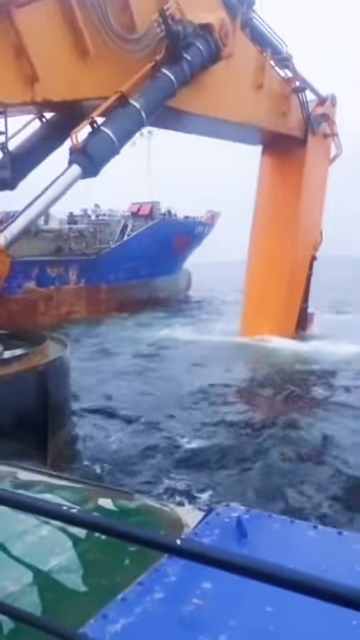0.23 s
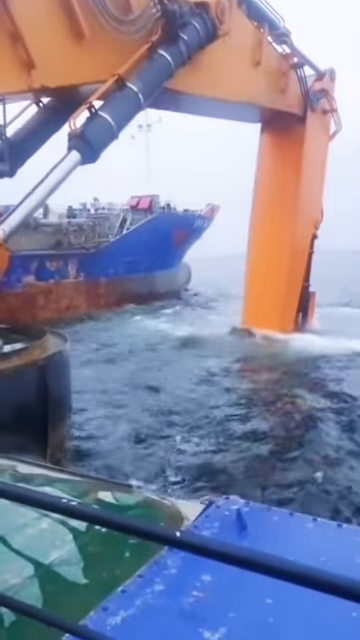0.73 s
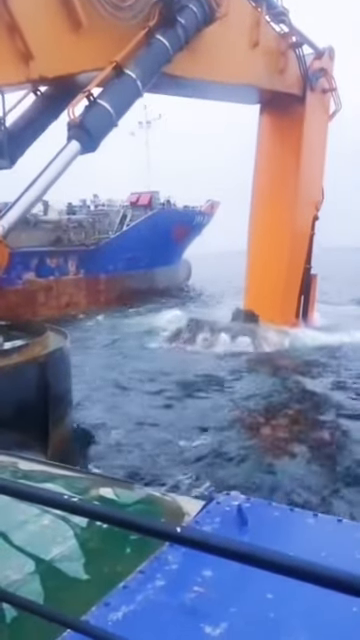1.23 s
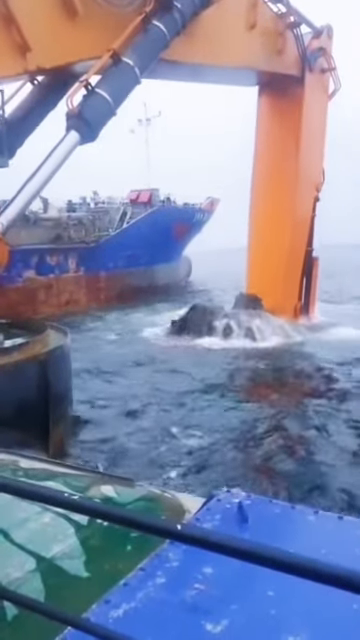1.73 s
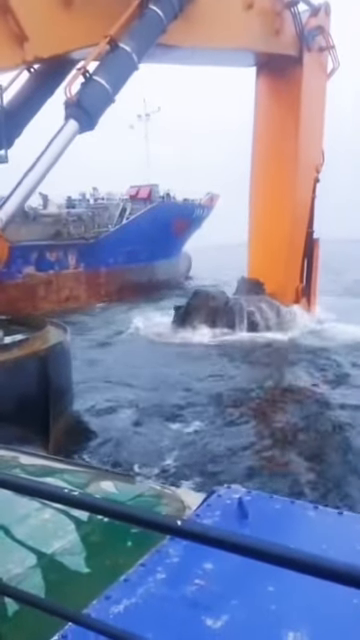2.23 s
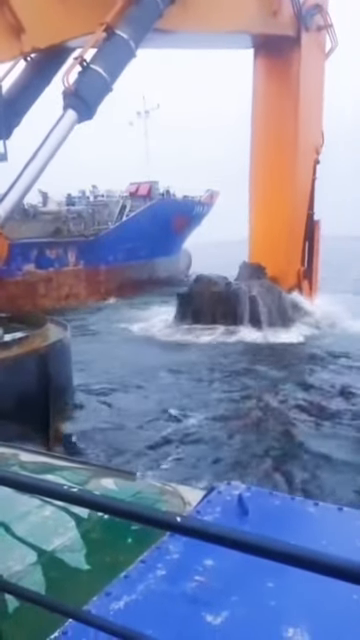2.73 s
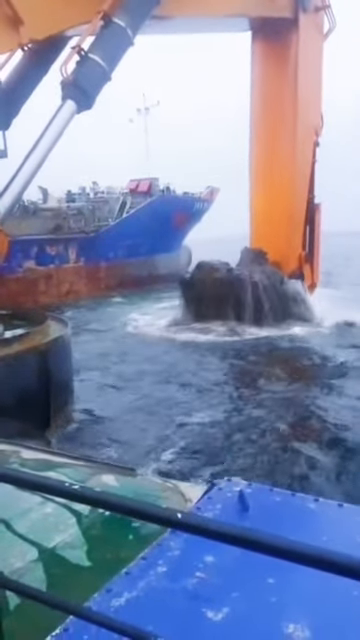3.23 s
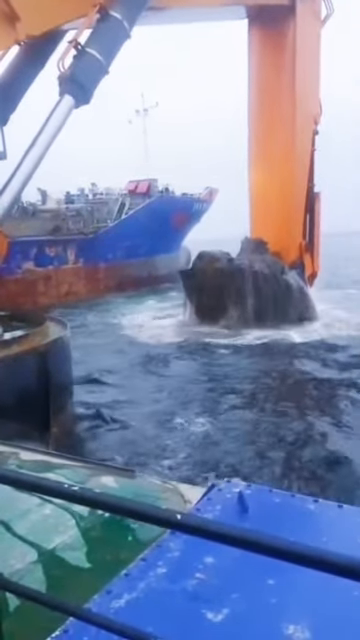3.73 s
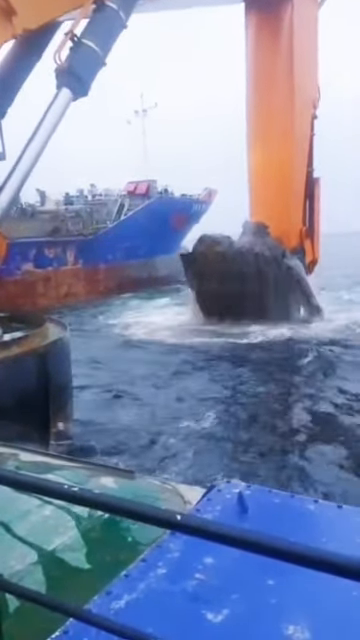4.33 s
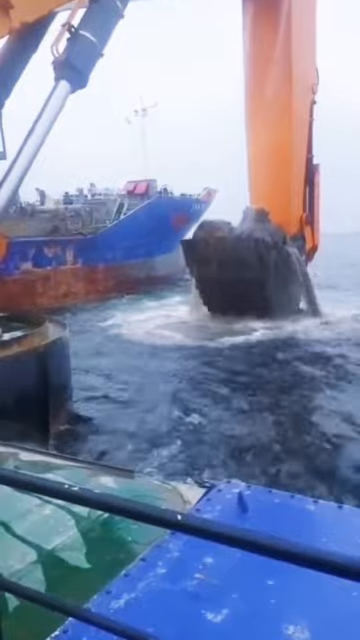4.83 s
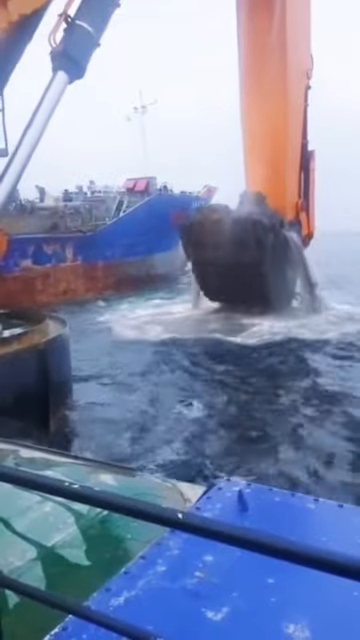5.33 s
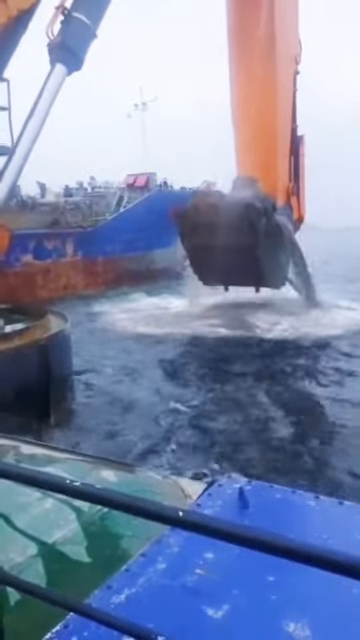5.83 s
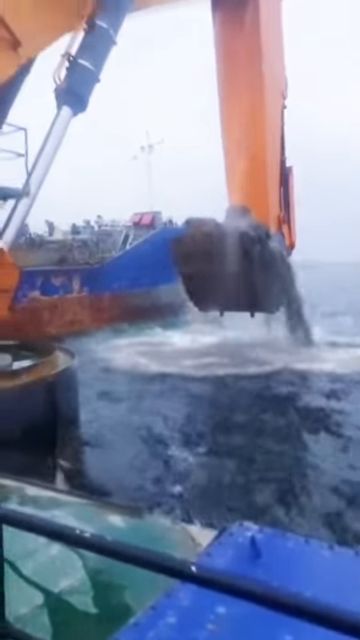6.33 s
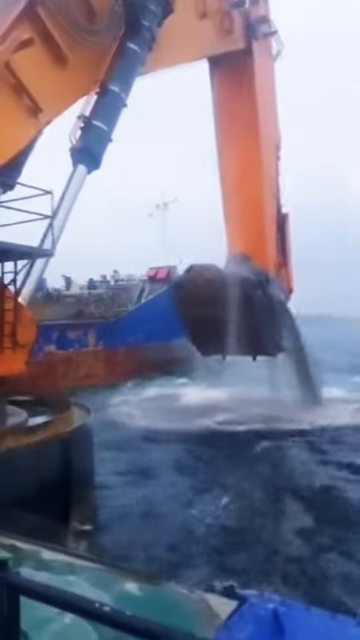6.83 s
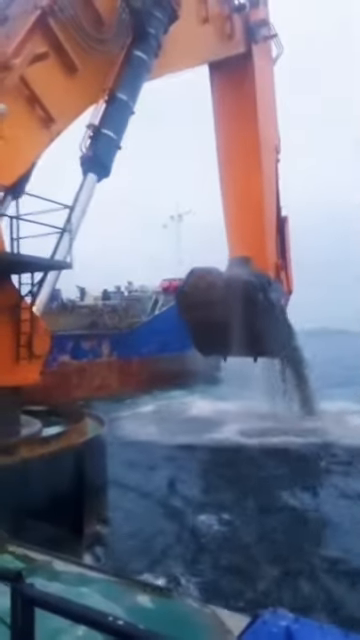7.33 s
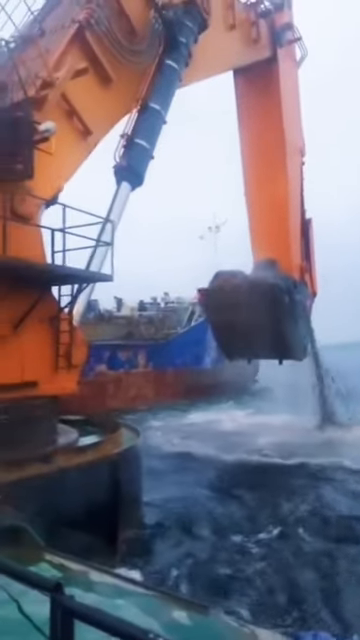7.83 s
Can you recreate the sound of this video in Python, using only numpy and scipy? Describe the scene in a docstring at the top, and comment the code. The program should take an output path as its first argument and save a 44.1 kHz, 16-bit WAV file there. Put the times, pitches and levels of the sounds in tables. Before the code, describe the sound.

On an open deck at sea, a large diesel drones low and steady beneath a wavering hydraulic pump and gear whine. Hard wind thumps the right side of a phone microphone for three seconds, then drops. Broad engine and fan roar continues; around five seconds water streaming from the rising bucket adds a brighter hiss. Thin whistles flutter, and the right side's bass keeps cutting out.

```python
"""A diesel drones on the deck of a dredger: sines at multiples of its cycle. Sines also make the song
of a nine-piston hydraulic pump and its gears, and thin whistles. Wind, lumpy noise, buffets the right port
of a phone, hard for three seconds; after that the right side's bass keeps dropping out. Behind it all,
banded noise is the roar of engine, fans and water streaming off the bucket."""
import sys
import numpy as np
from scipy import signal
from scipy.fft import rfft, irfft, next_fast_len
from scipy.io import wavfile
from scipy.ndimage import uniform_filter1d

SR = 44100
rng = np.random.default_rng(int(sys.argv[2]) if len(sys.argv) > 2 else 0)


def to_wav(sig):
    """Store sig (one row per channel, or 1-D mono) as 16-bit WAV at the path in sys.argv[1].

    Samples outside -1..1 are clipped; the rate is SR.
    """
    pcm = np.clip(np.atleast_2d(sig), -1, 1) * 32767
    pcm = np.round(pcm).astype(np.int16)
    wavfile.write(sys.argv[1], SR, pcm.T)  # frames by channels


N = 356548

# brighter hiss around 5.4 kHz while water pours, and two rough whistles before their flutter:
# time_s, added_db, rough_1_db, rough_2_db
BRIGHTNESS = [(0, 0, -62, -62), (2.9, 0, -60, -66), (3.1, -2, -66, -66), (4, 0, -56, -66),
              (4.4, 0, -60, -62), (5, 2.5, -50, -62), (5.35, 3, -54, -51), (5.9, 2.5, -55, -55),
              (6.2, 0, -58, -59), (6.6, -1, -64, -60), (8.08, -1, -62, -64)]


def undb(db):
    """Amplitude factor of a level in dB."""
    return 10 ** (np.asarray(db) / 20)


def curves(table):
    """Each column of a table, joined by straight lines over time."""
    time_s, *columns = np.transpose(table)
    return [np.interp(np.arange(N) / SR, time_s, column) for column in columns]


def bumps(events, edge_s):
    """Sum of flat-topped bumps (start s, length s, height) with sloped edges."""
    s = np.arange(N) / SR
    total = 0
    for start, length, height in events:
        inside_s = np.minimum(s - start, start + length - s)
        total = total + height * np.clip(inside_s / edge_s + .5, 0, 1)
    return total


def walk(rate_hz):
    """Random levels, each held for 1 / rate_hz and slewed twice; spread near 1."""
    hold = int(SR / rate_hz)
    steps = np.repeat(rng.standard_normal(N // hold + 1), hold)
    return 2.45 * uniform_filter1d(uniform_filter1d(steps, hold), hold)[:N]


def bands(spectrum, noise, count):
    """Noise of a given colour in overlapping bands, count an octave: yields (centre Hz, sound)."""
    size = next_fast_len(N)
    octave = np.log2(np.arange(1, size // 2 + 2) * SR / size)
    hz, db = np.transpose(spectrum)
    colour = undb(np.interp(octave, np.log2(hz), db)) * np.sqrt(SR / 2)
    coloured = rfft(noise, size) * colour
    for centre in np.arange(4, 14.5, 1 / count):
        share = np.clip(1 - count * abs(octave - centre), 0, 1)
        yield 2 ** centre, irfft(coloured * share, size)[..., :N]


def tone(turns, waver_db, rate_hz, lag_rad, stray_rad):
    """A sine at both ports: paths over steel and water interfere, so level and phase waver; the left lags."""
    stray = stray_rad * np.array([walk(rate_hz / 2), walk(rate_hz / 2)])
    phase = 2 * np.pi * (turns + rng.random()) + stray
    # each port fades by itself, and partly with the other
    fade_db = -waver_db * abs(np.array([walk(rate_hz), walk(rate_hz)]) + 0.66 * walk(rate_hz))
    return np.sqrt(2) * undb(fade_db) * np.sin(phase - lag_rad * np.array([[1], [0]]))


def diesel(rumble_db):
    """Low orders of the firing cycle, uneven cylinders."""
    # multiples of the diesel's cycle, before their waver: multiple, level_db (against the rumble)
    orders = [(3, -17.5), (4, -10.5), (5, -3), (7, -15.5), (8, -9.5), (9, -12.5), (13, -22)]
    cycle_hz = 15.0
    turns = cycle_hz * np.arange(N) / SR
    drone = sum(undb(db) * tone(k * turns, 0.6, 9., 0.14, 0.077) for k, db in orders)
    return undb(rumble_db) * drone


def pump(rush_db):
    """Nine pressure beats a turn, and the gears on the same shaft."""
    # shaft speed, hunting under load: time_s, speed_hz
    shaft = [(0.0, 23.94), (0.36, 23.92), (0.81, 24.39), (1.55, 24.01), (1.96, 24.15), (2.71, 24.12),
             (2.99, 24.47), (3.13, 24.29), (3.64, 24.1), (4.19, 24.22), (5.78, 24.02), (7.06, 24.28),
             (7.79, 23.92), (8.08, 23.99)]
    # first three piston tones swell and fade; before waver, a 4 dB lift and a right side 1.5 dB down:
    # time_s, tone_1_db, tone_2_db, tone_3_db
    piston = [(0.0, -19, -18.5, -37), (0.04, -20.5, -30.5, -42), (0.58, -23, -28.5, -43),
              (0.65, -42, -41, -44), (0.92, -29, -40.5, -39), (1.42, -36, -27.5, -44),
              (1.53, -20.5, -31, -47), (1.6, -18, -37, -39), (1.64, -21, -27.5, -47),
              (1.85, -27, -29.5, -42), (2.54, -38, -31.5, -46), (2.65, -32, -38, -43), (2.7, -24, -27, -39),
              (2.74, -39, -44, -35), (2.83, -28, -36, -42), (2.97, -32, -43, -47), (3.04, -39, -38, -39),
              (3.11, -29, -45, -43), (3.49, -27, -35, -52), (3.62, -37.5, -32.5, -48),
              (4.28, -23, -34, -52), (4.34, -21, -25.5, -46), (4.86, -27.5, -23, -36.5),
              (4.93, -22, -22, -45), (5.62, -48, -26, -42), (5.74, -23, -24, -34.5),
              (6.03, -21.5, -24.5, -32.5), (6.37, -20, -40.5, -43), (6.55, -18, -24, -38),
              (6.73, -34, -26, -51), (6.91, -20.5, -29, -54), (6.95, -22, -21, -33), (7.0, -32, -28, -41),
              (7.09, -15.5, -26, -37), (7.18, -24, -38, -34), (7.25, -16.5, -29, -35),
              (7.29, -35, -38, -49), (7.36, -33, -20.5, -34), (7.43, -23, -25, -43), (7.47, -35, -24, -49),
              (7.58, -13.5, -22.5, -33), (7.67, -36, -35, -30), (7.76, -30, -23, -31),
              (7.9, -20, -52, -32.5), (7.99, -16.5, -51, -29), (8.08, -29, -30, -29.5)]
    # other multiples of the shaft, before waver: multiple, level_db (against the rush)
    orders = [(8, -6), (10, 7.5), (16, -2), (17, 2), (36, -1), (45, -3.5), (54, -6.5), (63, -10),
              (72, -5.5), (81, -11)]
    # mesh of a 46-tooth gear, before waver: multiple (of the shaft), level_db (against the rush)
    gear_mesh = [(46, 2), (138, -10.5)]
    # second mesh harmonic before skips and waver; its paths shift, so each port hears it differently:
    # time_s, left_db, right_db, left_lag_rad
    whine_path = [(0.0, -34, -31, -2.8), (0.2, -30, -30, -3.1), (0.37, -30, -30, -3.1),
                  (0.43, -42, -26, -2.1), (0.53, -40, -35, -4.2), (0.63, -29, -40, -9.3),
                  (0.68, -33, -35, -7.5), (0.79, -39, -31, -5.9), (0.97, -37, -36, -6.4),
                  (1.07, -30, -42, -4.5), (1.2, -40, -39, -0.1), (1.44, -33, -29, -3.6),
                  (1.58, -33, -27, -4.3), (1.65, -31, -29, -4.5), (1.73, -38, -40, -3.5),
                  (1.87, -42, -39, -0.4), (2.36, -42, -31, -1.4), (2.7, -40, -36, -0.8),
                  (2.83, -34, -42, -2.5), (2.91, -41, -33, 2.2), (3.0, -42, -29, 5.5),
                  (3.07, -37, -38, 3.1), (3.14, -34, -38, -2.8), (3.25, -29, -33, 1.1),
                  (3.51, -39, -32, 4.7), (3.64, -36, -36, 3.5), (3.76, -42, -42, 7.0),
                  (3.84, -37, -33, 5.0), (4.19, -37, -40, 5.9), (4.45, -32, -31, 4.6),
                  (4.51, -41, -30, 4.9), (4.75, -31, -32, 6.1), (4.9, -32, -29, 5.2), (5.04, -39, -32, 5.8),
                  (5.43, -34, -30, 3.9), (5.5, -30, -30, 3.2), (5.56, -33, -32, 2.9), (5.63, -29, -26, 2.4),
                  (5.78, -29, -24, 2.5), (5.85, -29, -24, 2.7), (6.04, -33, -28, 2.2), (6.1, -38, -39, 3.1),
                  (6.18, -42, -37, 6.1), (6.29, -31, -34, 5.2), (6.48, -34, -35, 5.9),
                  (6.57, -28, -28, 6.4), (6.72, -32, -36, 6.0), (6.8, -34, -38, 3.4), (7.09, -33, -30, 1.8),
                  (7.3, -41, -42, 4.1), (7.63, -26, -29, 5.7), (7.69, -27, -24, 6.6), (7.87, -27, -31, 8.0),
                  (7.94, -28, -29, 7.2), (8.08, -36, -34, 4.0)]
    # the whine skips or chirps briefly at both ports: start_s, length_s, added_db
    skips = [(0.52, 0.035, -3), (3.04, .05, -11), (3.435, 0.018, 11.5), (3.485, 0.029, 7),
             (3.655, .04, -13), (5.155, .025, -6), (6.08, 0.052, -6), (6.74, .04, -6), (7.07, 0.046, 2),
             (7.195, .03, -7), (7.26, 0.079, -8)]
    skip_edge_s, overtone_db = 0.0059, -20  # overtone before waver, against the whine

    turns = np.cumsum(curves(shaft)[0]) / SR
    port_db = np.array([[0], [-1.5]]) + 4.0
    beats = 0
    for k, db in enumerate(curves(piston), 1):
        beats = beats + undb(db + port_db) * tone(9 * k * turns, 2.05, 20., 0.45, 0.27)
    upper = sum(undb(db) * tone(k * turns, 2.1, 20., 0.11, 0.76) for k, db in orders)
    mesh = sum(undb(db) * tone(k * turns, 4.3, 30., 2.35, k / 70) for k, db in gear_mesh)

    *port_dbs, whine_lag = curves(whine_path)
    whine_dbs = np.array(port_dbs) + bumps(skips, skip_edge_s)
    whine = undb(whine_dbs) * tone(92 * turns, 1.1, 25., whine_lag, 0.05)
    octave_db = np.mean(whine_dbs, axis=0) + overtone_db
    octave_tone = undb(octave_db) * tone(184 * turns, 5., 30., 2.35, 2.2)
    return beats + undb(rush_db) * (upper + mesh) + whine + octave_tone


def wind():
    """Eddies burst against the right port in quick lumps; strong puffs reach higher."""
    # wind blows hard, then drops; before puffs and lumps: time_s, level_db
    blow = [(0, -11.5), (.55, -14.5), (.9, -10), (1.15, -11), (1.4, -14), (1.75, -15.5), (2.2, -9.5),
            (2.6, -11.5), (2.93, -13), (3.06, -11), (3.09, -20), (4.1, -27.5), (4.7, -21.5), (8.08, -17.5)]
    # colour at the port before the upper eddies are weighted: pitch_hz, density_db (per Hz)
    gust = [(25, -56), (40, -29), (70, -23.5), (160, -27.5), (260, -23.5), (500, -27), (1000, -32),
            (2000, -43), (4000, -55), (8000, -79.5)]
    # sharp puffs: start_s, added_db (upper eddies, before their reach), length_s
    puffs = [(0.27, 2, 0.037), (0.402, 2.5, 0.018), (0.497, -1, 0.02), (0.606, 5.5, 0.043),
             (0.67, 6, 0.039), (0.801, 3.5, 0.018), (0.92, 4, 0.11), (1.126, 0, 0.074), (1.79, 3, 0.033),
             (1.982, 4, 0.032), (2.116, 2, 0.061), (2.16, 6, .055), (2.237, 5.5, 0.055),
             (2.398, 3.5, 0.032), (2.735, 7.5, 0.037), (2.806, 6, 0.038), (2.875, 4.5, 0.022),
             (2.974, 5, 0.045), (3.02, 5.5, 0.029), (3.051, 5, 0.02), (5.726, 11, .03), (5.839, 13, 0.032),
             (6.028, 10.5, 0.041), (6.253, 7, 0.035), (6.57, 8.5, 0.057), (7.074, 6, 0.035),
             (7.332, 2, 0.029)]
    puff_rise_s = 0.003
    upper_eddies_db = -14.5  # against the level, before their reach
    puff_bass = 0.23  # share of a puff's dB that lifts the whole wind, bass included

    puff_db = bumps([(start, length, db) for start, db, length in puffs], puff_rise_s)
    upper_db = upper_eddies_db + puff_db + 0.5 * walk(16.0) + 2.0 * np.tanh(walk(60.))
    lumps = undb(2.87 * np.tanh(walk(90.) / 0.64) + 0.15 * walk(30.))
    gusts = 0
    for hz, band in bands(gust, rng.standard_normal(N) * lumps, count=2):
        reach = np.clip(np.log2(hz / 250) / 2.1, 0, 1.1)
        gusts = gusts + undb(reach * upper_db) * band
    return undb(curves(blow)[0] + puff_bass * puff_db) * gusts


def whistles():
    """Thin tones of other machines, broken by quick flutter."""
    # whistle of fixed pitch, before flutter: pitch_hz, level_db (against its level curve)
    thin = [(2402, 9)]
    # that whistle comes and goes: time_s, level_db
    thin_level = [(0.0, -67), (0.72, -45.5), (1.06, -66), (1.15, -53), (1.78, -48), (1.86, -53), (2.0, -42),
                  (2.11, -47), (3.4, -56), (3.49, -49), (3.56, -57), (3.96, -45), (4.03, -65), (4.16, -48),
                  (4.5, -43), (4.63, -54), (4.86, -39), (5.31, -48), (6.17, -54), (6.53, -42),
                  (6.57, -37.5), (6.8, -57), (7.9, -49), (8.08, -59)]
    # the two rough whistles: pitch_hz
    rough_pitches = [5055, 5665]
    s = np.arange(N) / SR
    rough = 0
    for hz, db in zip(rough_pitches, curves(BRIGHTNESS)[1:]):
        rough = rough + undb(db) * tone(hz * s, 2.5, 40., 1.5, 1.2)
    clear = sum(undb(db) * tone(hz * s, 5.4, 25., 0.39, 0.37) for hz, db in thin)
    return rough + undb(curves(thin_level)[0]) * clear


def roar(rumble_db, rush_db):
    """Broad noise: lows follow the rumble, highs the rush of water; part of it is shared by the ports."""
    # engine, fans and water, before swell and flicker: pitch_hz, density_db (per Hz)
    colour = [(25, -65), (40, -55.5), (70, -46.5), (150, -49.5), (250, -54.5), (500, -59), (1000, -66),
              (2000, -67.5), (3500, -77), (5500, -79.5), (6500, -89), (7500, -103.5), (9000, -93.5),
              (13000, -95)]
    # engine side reaches the right port first, water side the left; cut to whole samples
    engine_lag, water_lead = int(0.000079 * SR), int(0.00027 * SR)
    engine, water, left, right = rng.standard_normal((4, N))
    engine_pair = [np.roll(engine, engine_lag), engine]
    water_pair = [np.roll(water, -water_lead), water]
    noises = np.array([*engine_pair, *water_pair, left, right])

    swell, bright_db = walk(37.0), curves(BRIGHTNESS)[0]
    low_db, high_db = rumble_db - rumble_db.mean(), rush_db - rush_db.mean()
    total = 0
    for hz, band in bands(colour, noises, count=3):
        alike = np.clip(.8 - 0.12 * np.log2(hz / 60), 0, 1)
        wet = np.clip(np.log2(hz / 900) / 0.58, 0, 1)
        mix = np.clip(np.log2(hz / 150) / 0.96, 0, 1)
        # all bands swell a little together and flicker alone
        flicker_db = .9 * walk(45.) + .5 * mix * walk(24.)
        db = (1 - mix) * low_db + mix * high_db + .35 * swell + flicker_db
        db = db + bright_db * np.exp(-(np.log2(hz / 5400) / .35) ** 2)
        shared = np.sqrt(1 - wet) * band[:2] + np.sqrt(wet) * band[2:4]
        total = total + undb(db) * (np.sqrt(alike) * shared + np.sqrt(1 - alike) * band[4:])
    return total


def scene():
    """The deck at both ports, with wind at the right one alone."""
    # rumble and rush grow as the bucket clears the water: time_s, rumble_db, rush_db
    deck_level = [(0, -25.5, -38.5), (.9, -20.5, -39.5), (2, -23, -39.5), (3.1, -25, -41),
                  (4.2, -21.5, -40.5), (4.8, -22, -36), (5.3, -21.5, -37), (6.1, -20, -36.5),
                  (6.4, -25, -36), (6.8, -20.5, -37), (8.08, -18.5, -36)]
    rumble_db, rush_db = curves(deck_level)
    deck = diesel(rumble_db) + pump(rush_db) + whistles() + roar(rumble_db, rush_db)
    return deck + np.array([[0], [1]]) * wind()


def record(dry):
    """The right side loses its bass in bursts; peaks are rounded, the start fades in and the top is cut."""
    # bass drops on the right, on top of its level between drops: start_s, length_s, depth_db
    drops = [(3.1, 0.25, -16), (3.52, 0.075, -11), (3.71, 0.15, -13), (4.2, 0.067, -16), (5.46, 0.044, -20),
             (5.53, 0.076, -13), (5.79, 0.15, -8), (6.03, 0.079, -16), (6.16, 0.068, -13),
             (6.27, 0.11, -20), (6.4, 0.18, -10), (6.63, 0.13, -22), (6.78, 0.098, -21), (7.0, 0.072, -23),
             (7.15, 0.085, -12), (7.28, 0.078, -20), (7.65, 0.095, -13), (7.82, 0.06, -17)]
    drop_edge_s, top_hz = 0.011, 13000
    between_db, shimmer_db = -2, 1  # bass level and unrest from the first drop on
    size = next_fast_len(N)
    hz = np.arange(size // 2 + 1) * SR / size
    bass = irfft(rfft(dry[1], size) / (1 + (hz / 300) ** 12), size)[:N]
    s = np.arange(N) / SR
    late = s > drops[0][0]
    bass_db = bumps(drops, drop_edge_s) + late * (between_db + shimmer_db * walk(25.))
    right = dry[1] - (1 - undb(bass_db)) * bass
    rounded = np.tanh(1.05 * np.array([dry[0], right])) / 1.05
    faded = rounded * np.clip(s / .004, 0, 1)
    top_cut = signal.ellip(10, .2, 80, top_hz, fs=SR, output="sos")
    return signal.sosfilt(top_cut, faded)


dry = scene()
out = record(dry)
to_wav(out)
```